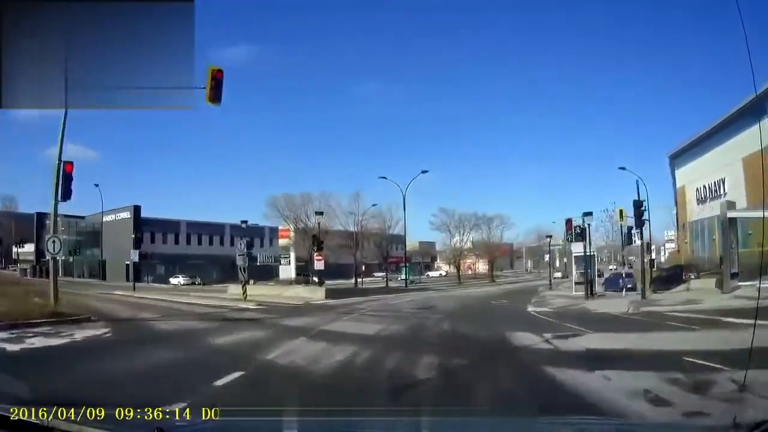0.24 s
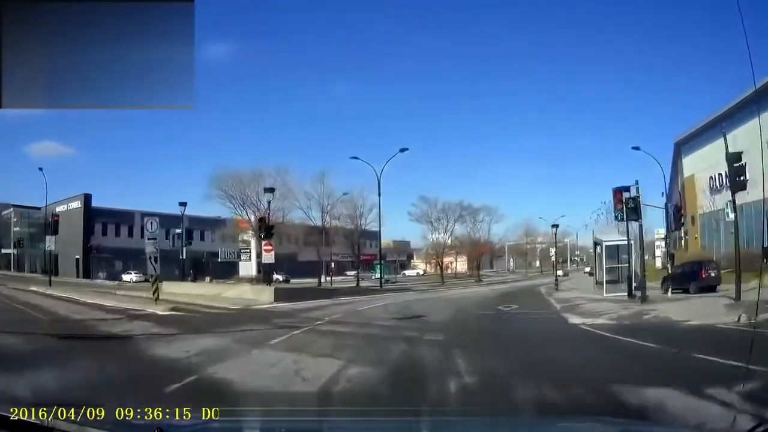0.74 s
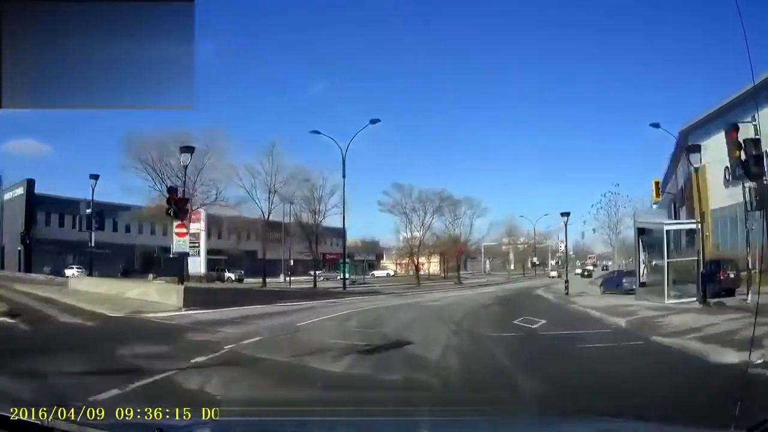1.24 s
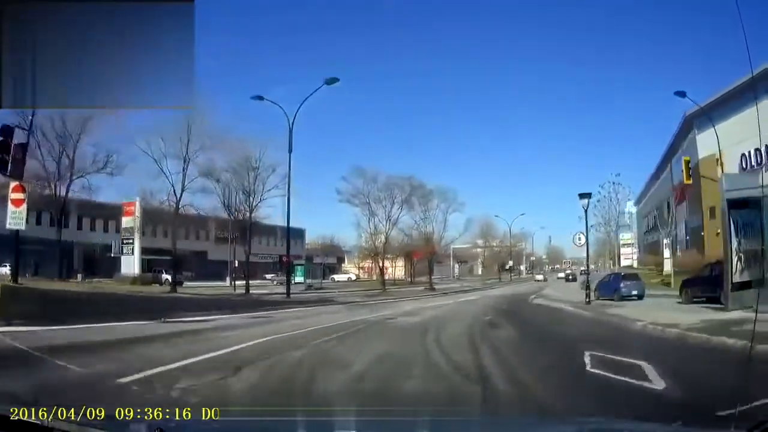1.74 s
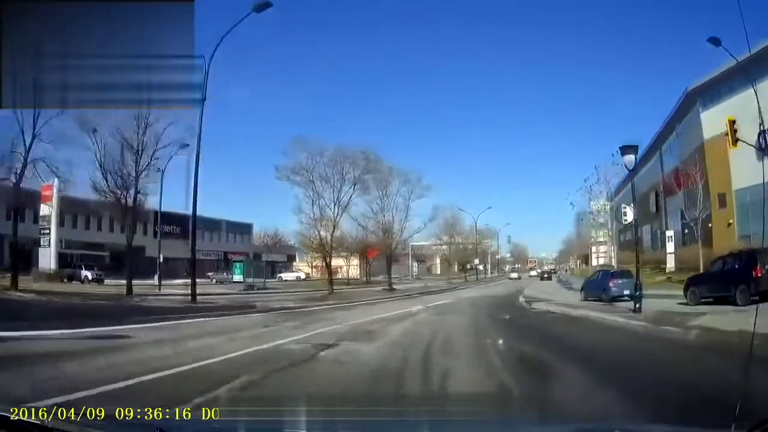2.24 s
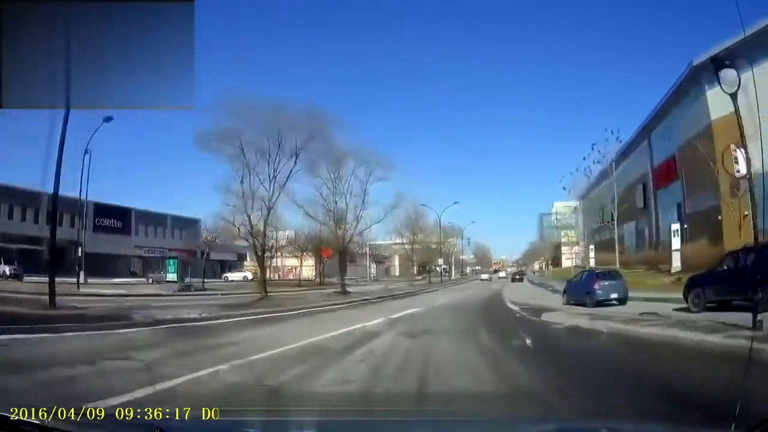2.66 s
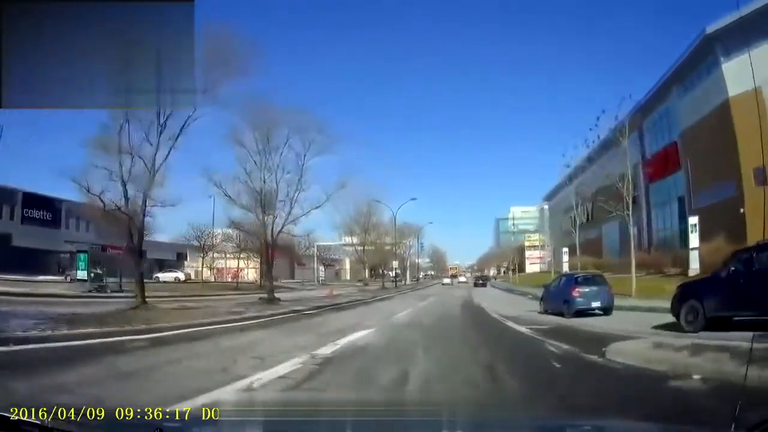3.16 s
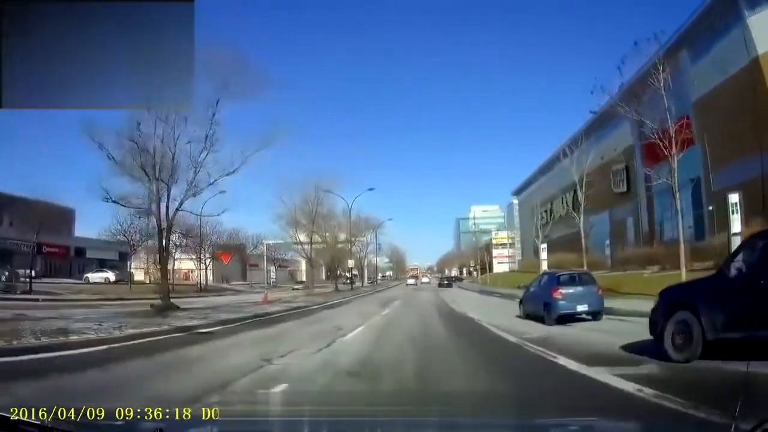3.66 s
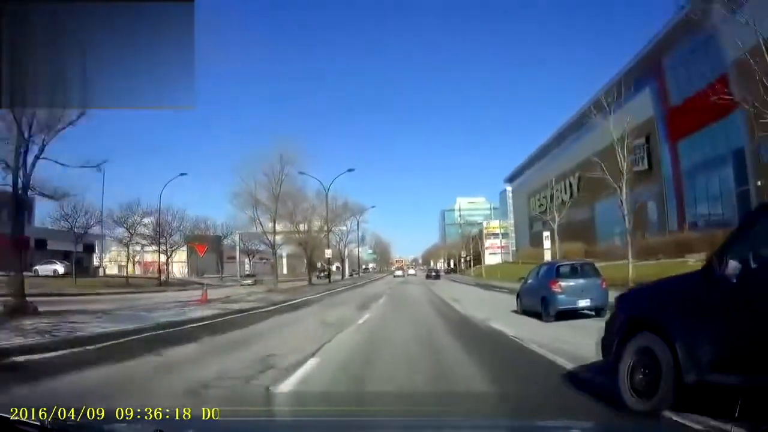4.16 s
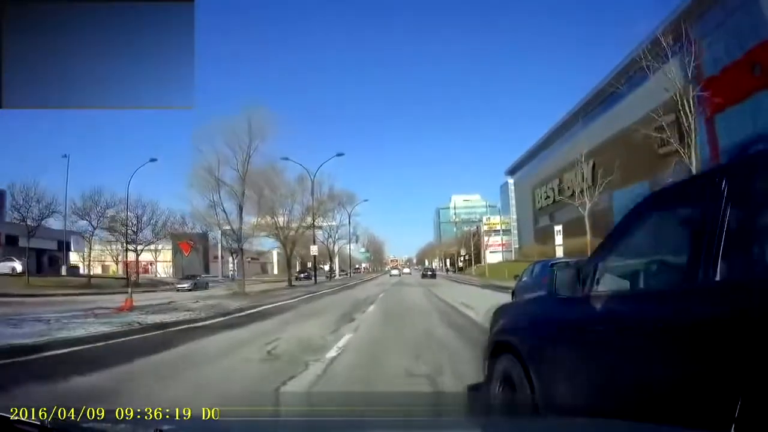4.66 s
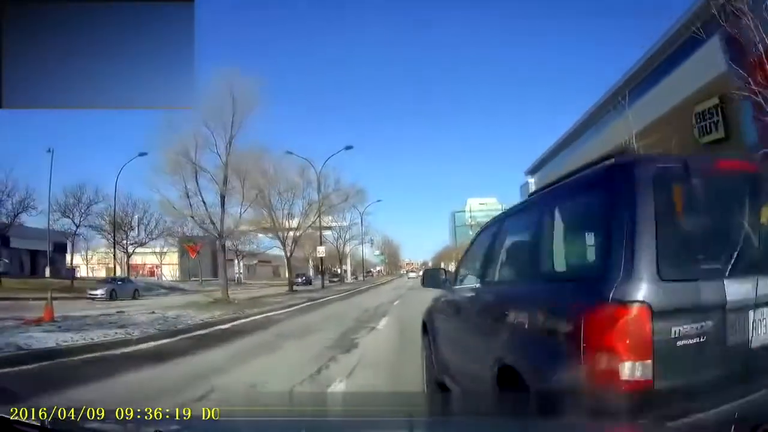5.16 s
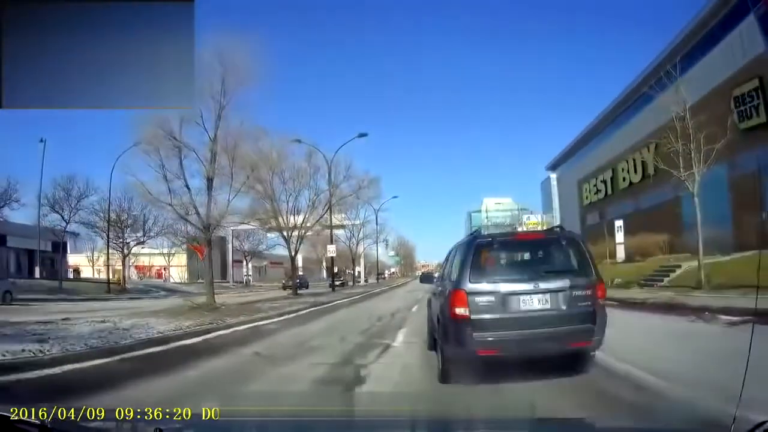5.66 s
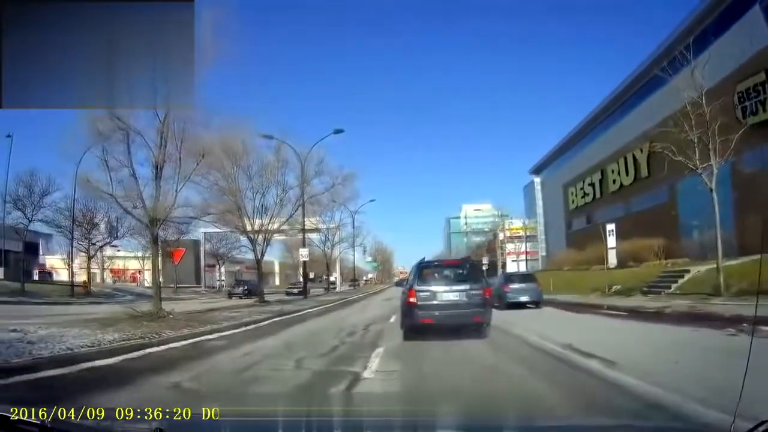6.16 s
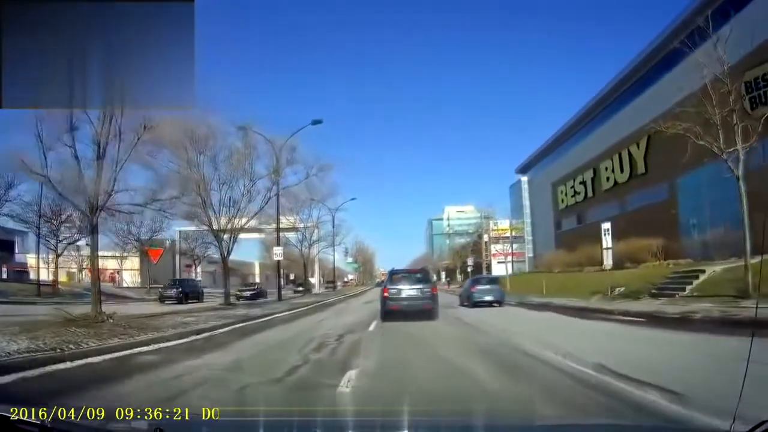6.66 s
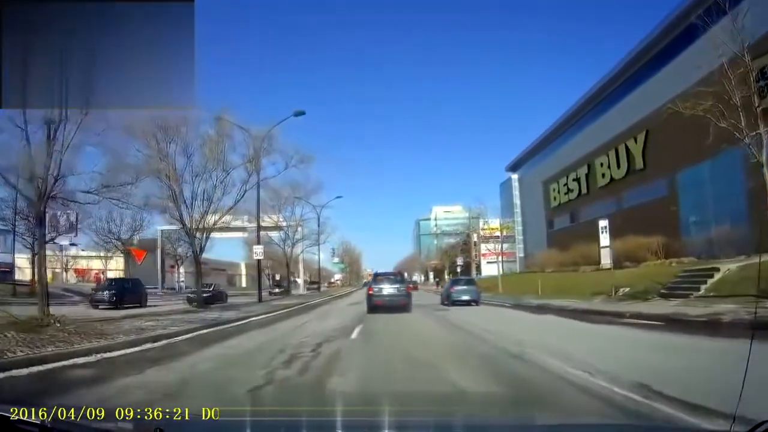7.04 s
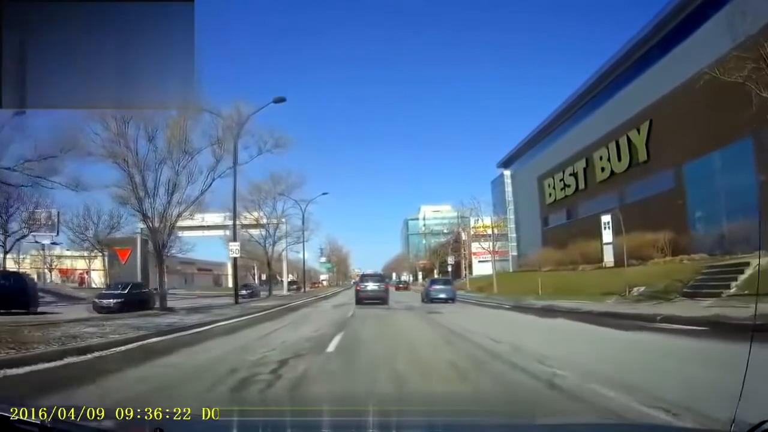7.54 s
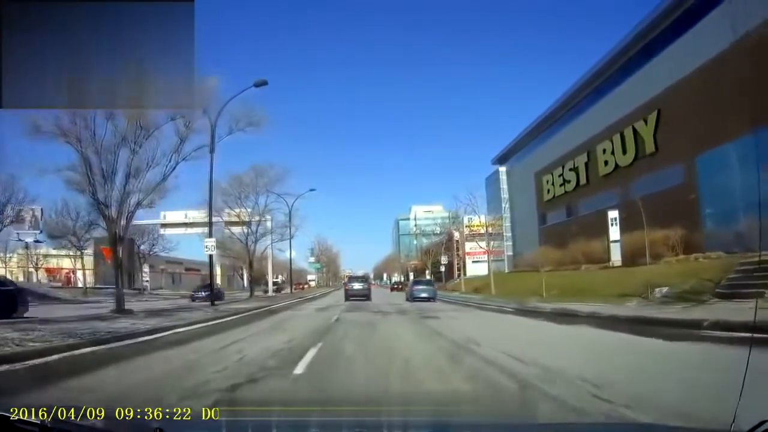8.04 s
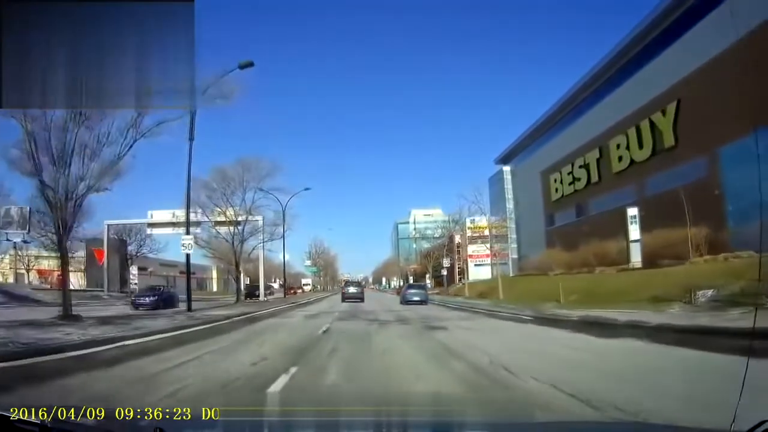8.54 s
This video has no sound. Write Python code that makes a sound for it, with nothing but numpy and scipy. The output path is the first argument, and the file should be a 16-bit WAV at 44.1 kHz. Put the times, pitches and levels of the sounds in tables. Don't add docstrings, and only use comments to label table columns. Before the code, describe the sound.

Heard from a dashboard microphone inside a car on a city road: low tyre roar, body boom and wind with small bumps. A sharp slap on the horn pad starts one long, buzzing blast. Hard braking scrubs the tyres, loose things slide, thud and jingle, and the sound briefly ducks. The horn stops, slow quiet rolling follows, then a few knocks and the engine revving gently.

```python
import sys
import numpy as np
from scipy import signal
from scipy.fft import rfft, irfft, next_fast_len
from scipy.io import wavfile
from scipy.ndimage import uniform_filter1d

SR = 44100
rng = np.random.default_rng(int(sys.argv[2]) if len(sys.argv) > 2 else 0)


def put_to_file(sound):
    columns = np.atleast_2d(sound).T
    safe = np.clip(columns, -1, 1)
    whole_steps = np.round(safe * 32767)
    wavfile.write(sys.argv[1], SR, whole_steps.astype(np.int16))


def makeup_ratio(level_db):
    decades = np.asarray(level_db, float) / 20
    return 10 ** decades


N = 388521
TIME = np.arange(N) / SR
SIZE = next_fast_len(N, True)
HZ = np.maximum(np.arange(SIZE // 2 + 1) * SR / SIZE, 1)

# (centre [Hz], width [Hz], level [dB])
PLASTIC_MODES = [(4500, 1500, 1.5), (7900, 1100, 1.5), (10500, 2500, -3.5), (14000, 2500, -10.5)]


def shaped(gain):
    x = irfft(rfft(rng.standard_normal(SIZE)) * gain, SIZE)[:N]
    return x / np.std(x)


def band(lo_hz, hi_hz):
    return 1 / np.sqrt((1 + (lo_hz / HZ) ** 8) * (1 + (HZ / hi_hz) ** 8))


def humps(modes):
    return sum(makeup_ratio(2 * db) / (1 + (2 * (HZ - f) / width) ** 2) for f, width, db in modes)


def walk(rate):
    hold = int(SR / rate)
    steps = np.repeat(rng.standard_normal(N // hold + 1), hold)
    return 1.35 * uniform_filter1d(uniform_filter1d(steps, hold), hold)[:N]


def bell(s, length):
    return np.exp(-((TIME - s) / length) ** 2)


def add(out, s, x):
    i = int(s * SR)
    out[i:i + len(x)] += x[:len(out) - i]


def fade(t60, rise):
    t = np.arange(int((t60 + 4 * rise) * SR)) / SR
    envelope = (1 - np.exp(-t / rise)) ** 2 * np.exp(-np.log(1000) * t / t60)
    return t, envelope / envelope.max()


def strike(out, s, hz, db, rise, t60):
    t, envelope = fade(t60, rise)
    add(out, s, makeup_ratio(db) * envelope * np.sin(2 * np.pi * hz * t))


def duck():
    start_s, fall_s, hold_s, back_s = 5.045, 0.09, 0.14, 0.054
    duck_db, after_db = -13.5, -1
    down = np.clip((TIME - start_s) / fall_s, 0, 1)
    back = np.exp(-np.maximum(TIME - start_s - fall_s - hold_s, 0) / back_s)
    return down * (after_db + (duck_db - after_db) * back)


def horn():
    # (multiple, with a car alongside [dB], once it has gone [dB], ring-down [s], wander [dB])
    low_partials = [(1, -23.5, -21.5, 0.071, -0.06), (2, -29.5, -32.5, .1, -0.8),
                    (3, -21.5, -22.5, 0.051, -0.95), (4, -44, -47, 0.14, -0.7), (5, -32.5, -30, 0.054, 1.1),
                    (6, -42, -56, .07, -1), (7, -40, -47.5, 0.056, .4)]
    # (multiple, with a car alongside [dB], once it has gone [dB])
    high_partials = [(8, -59, -62), (9, -68, -62), (10, -72, -69), (11, -76, -75), (12, -68, -71),
                     (13, -73, -74)]
    # (multiple, time [s], length [s], level [dB])
    echoes = [(1, 4.04, 0.18, 1.5), (1, 4.4, 0.092, 1), (1, 5.26, .04, 4), (2, 5.3, .14, -5),
              (5, 4.56, 0.45, -6.5), (5, 4.7, 0.074, 3), (5, 6.25, 0.16, 2.5), (5, 4.01, 0.13, 3),
              (6, 5.52, 0.2, 13), (7, 5.59, 0.16, 5.5), (8, 6.68, 0.1, 5), (3, 3.95, .15, -2),
              (2, 5.42, .1, -2.5), (5, 4.35, .08, -3), (5, 4.93, .07, -3), (5, 5.28, .04, 3),
              (8, 4.5, .3, 3), (2, 6.76, .08, 3), (9, 6.4, .5, 3), (7, 6.75, .1, -3), (3, 5.06, .03, -4)]
    on_s, off_s, horn_hz = 3.8, 6.8, 408.9
    attack_s, start_flat_hz, pull_up_s, sag_hz_per_s = 0.011, 15, 0.015, 100
    last_ring_s, last_ring_db = 0.035, 11
    tail_db, tail_t60_s = -14, 0.25
    bounce_rad = -2.2
    shake_rad = 0.05

    since, after = np.maximum(TIME - on_s, 0), np.maximum(TIME - off_s, 0)
    hz = horn_hz - start_flat_hz * np.exp(-since / pull_up_s) - sag_hz_per_s * np.minimum(after, 0.1)
    turn = 2 * np.pi * np.cumsum(hz + 0.37 * walk(40)) / SR
    gone = np.interp(TIME, [3.8, 5.0, 5.4, 6.8], [0, 0.15, 0.7, 1])
    last_db = last_ring_db * bell(off_s + last_ring_s, 0.7 * last_ring_s)
    cabin_tail_db = tail_db - 60 * after / tail_t60_s
    tone = 0
    for k, near_db, gone_db, ring, wander_db in low_partials + [row + (0.05, 1.2) for row in high_partials]:
        db = near_db + (gone_db - near_db) * gone + (k == 2) * last_db
        db = db + np.maximum(-60 * (after / ring) ** 2.6, cabin_tail_db)
        echo = sum(echo_db * bell(s, length) for which, s, length, echo_db in echoes if which == k)
        db = db + (1 + 0.35 * walk(35)) * echo
        wander, flutter = walk(13), walk(30)
        db = db + min(wander_db, 1.3) * wander + 0.84 * flutter
        stroke = np.pi / 2 * (k % 2 == 0)
        bounce = ((k > 2) * bounce_rad + k * shake_rad * flutter) * (1 - gone)
        tone = tone + np.sqrt(2) * makeup_ratio(db) * np.cos(k * turn + stroke + bounce)
    metal = makeup_ratio(-50.5) * shaped(band(900, 2300)) + makeup_ratio(-64.5) * shaped(band(2200, 2800))
    fizz = (1 + 0.7 * np.cos(turn)) * metal * makeup_ratio(-60 * (after / 0.08) ** 2)
    return (1 - np.exp(-since / attack_s)) * makeup_ratio(duck()) * (tone + fizz)


def knocks():
    # (time [s], crack [dB], panel [dB], sizzle [dB], ring-down [s])
    slaps = [(0.636, -45, -39, -66, 0.061), (2.2098, -53, -37, -56, 0.019), (3.658, -46, -32.5, -62, 0.03),
             (3.7689, -25, -30, -47, 0.075), (3.7775, -10, -21, -33, 0.035), (3.7815, -19, -28, -35, .03),
             (3.785, -16, -25, -34, 0.02), (3.7935, -18, -27, -39, .012), (3.801, -32, -40, -50, .08),
             (3.812, -31, -44, -54, .06), (3.789, -21, -38, -36, 0.14),
             (3.8363, -28.5, -25.5, -55.5, 0.064), (3.8504, -24.5, -32, -50, 0.06),
             (4.0135, -28, -26, -57.5, 0.04), (4.1844, -44, -22.5, -50, 0.039),
             (6.858, -45, -35.5, -65, 0.083), (7.251, -50, -37, -70, 0.025), (8.046, -30, -33.5, -47, 0.05),
             (8.068, -34, -36, -62, 0.04), (8.092, -37, -42, -55.5, 0.04), (8.5822, -26.5, -30, -54, 0.03),
             (8.588, -34, -36, -60, .07)]
    # (time [s], crack [dB], panel [dB], sizzle [dB], ring-down [s])
    dash_hits = [(5.034, -33, -30, -55, 0.052), (5.041, -33, -18, -55, .05), (5.0705, -22, -20, -32, .03),
                 (5.0835, -24, -25, -33, .02), (5.0534, -28, -25, -33, 0.04),
                 (5.0625, -21, -9.5, -33, 0.055), (5.0745, -9, -13, -15, 0.016),
                 (5.0804, -33.5, -28.5, -50, 0.029), (5.0963, -31, -25, -49.5, 0.054),
                 (5.1217, -38, -40, -61.5, 0.053), (5.1392, -47, -24, -47, 0.052),
                 (5.1542, -43, -47, -55, 0.037), (5.197, -23, -24, -57, 0.017),
                 (5.2205, -27, -24, -43.5, 0.018), (5.402, -26, -29, -44, 0.04),
                 (5.408, -36, -40, -47, .12), (5.523, -33, -34, -39, 0.023), (5.5325, -42, -34, -46, 0.07),
                 (5.5852, -38, -42, -46, 0.027), (5.598, -39, -24, -39, 0.013)]
    # (time [s], peak [dB])
    plastic_ticks = [(5.0514, -27), (5.0914, -36), (5.108, -42), (5.1297, -39), (5.1364, -39),
                     (5.1424, -34), (5.1477, -36), (5.154, -34), (5.1604, -37), (5.1684, -41),
                     (5.1734, -43), (5.1794, -47), (5.186, -42), (5.1961, -40), (5.2165, -36), (5.283, -43),
                     (5.2074, -41), (5.2234, -46), (5.23, -48), (5.2428, -42), (5.252, -38),
                     (5.2644, -37.5), (5.2686, -34), (5.275, -43), (5.2804, -44), (5.3108, -53),
                     (5.3373, -53), (5.6015, -41), (5.6095, -42.5), (5.6225, -46), (3.8385, -40),
                     (6.8349, -48)]
    # (centre [Hz], width [Hz], level [dB])
    shell_modes = [(2320, 570, 9.5), (5230, 2000, 2)]
    # (centre [Hz], width [Hz], level [dB])
    trim_modes = [(268, 77, 2.5), (570, 350, 7), (1050, 100, 6), (1750, 58, -9.5), (2340, 730, -3)]

    crack, panel, sizzle, tick = np.zeros((4, N))
    for s, crack_db, panel_db, sizzle_db, t60 in slaps + dash_hits:
        s, t60 = s - 0.0015, max(t60, 0.005)
        add(crack, s, makeup_ratio(crack_db - 10.5) * fade(t60, 0.0015)[1])
        add(panel, s, makeup_ratio(panel_db) * fade(1.92 * t60, 0.0007)[1])
        add(sizzle, s, makeup_ratio(sizzle_db - 1.0) * fade(0.38 * t60, 0.00066)[1])
    for s, db in plastic_ticks:
        add(tick, s, makeup_ratio(db - 6) * fade(0.0037, 0.00035)[1])
    cracks = crack * shaped(band(1600, 7000) ** 2 * np.sqrt(1 + humps(shell_modes)))
    panels = panel * shaped(np.sqrt(humps(trim_modes)) * band(150, 3200))
    sizzles = sizzle * shaped(band(6500, 19000) * (8000 / HZ) ** 1.3)
    ticks = tick * shaped(np.sqrt(humps(PLASTIC_MODES)) * band(6000, 15500))
    return cracks + panels + sizzles + ticks


def thuds():
    # (time [s], pitch [Hz], peak [dB], rise [s], ring-down
    # [s])
    struck_modes = [(0.618, 101, -33, 0.017, 0.21), (2.19, 50, -22, .01, 0.085), (3.71, 129, -24, 0.005, .1),
                    (4.14, 130, -37.5, .02, 0.19), (4.13, 31.8, -23.5, 0.021, 0.28),
                    (4.15, 501, -26, 0.01, 0.2), (4.165, 545, -29, .006, .12), (4.19, 480, -27, .006, .15),
                    (4.14, 60, -20, .008, .1),
                    (5.037, 263, -14.5, 0.003, 0.09), (5.082, 240, -14, .004, .06),
                (5.168, 105, -21, .008, .12), (5.21, 100, -23, .01, .15), (5.148, 400, -16, .003, .05),
                (5.061, 482, -8, 0.0065, 0.078), (5.08, 126.3, -15, 0.011, 0.12),
                (5.14, 236.3, -13.5, 0.0092, 0.15), (5.138, 116, -14, 0.0068, 0.12),
                (5.179, 40.5, -15, 0.0085, .2), (5.04, 206.5, -19, 0.026, 0.38),
                (5.16, 317, -18.5, .015, 0.13), (5.192, 229, -15, 0.005, 0.067),
                (5.25, 230, -23, 0.011, 0.13), (5.52, 121.4, -21, 0.025, 0.37),
                (5.57, 270, -20, .015, 0.093), (5.72, 522, -23, 0.0058, 0.12), (5.735, 480, -28, .004, .08),
                (5.105, 330, -16, .004, .06), (5.17, 420, -19, .004, .08), (5.108, 150, -18, .005, .07),
                (5.74, 40.5, -25, 0.017, 0.2),
                    (2.212, 1060, -21, .0006, .022), (2.212, 1700, -26, .0006, .02),
                 (2.212, 3000, -33, .0004, .012), (3.772, 709, -18.5, 0.0044, 0.088),
                 (8.055, 800, -36, .002, .03), (8.048, 2600, -40, .001, .02), (8.066, 150, -25, .002, .04),
                 (8.584, 1950, -36, .001, .03), (8.523, 5000, -55, .001, .015),
                 (8.529, 5200, -54, .001, .03), (8.548, 5200, -50, .001, .015),
                 (8.549, 2100, -44, .001, .02), (6.818, 2400, -40, .002, .04),
                 (6.833, 2100, -46, .002, .05), (2.211, 620, -27, .001, .03), (2.2, 300, -28, .003, .05),
                 (5.09, 45, -22, .01, .2), (6.833, 5500, -49, .002, .015), (6.836, 5100, -51, .002, .015),
                 (6.375, 4800, -58, .003, .04), (3.838, 5300, -34, .0006, .025),
                 (3.777, 6500, -24, .0008, .03), (3.778, 4400, -24, .0008, .04),
                 (7.248, 512, -33, .001, .025), (7.252, 1600, -45, 0.0009, 0.03),
                 (7.253, 1100, -38, 0.0009, 0.03), (7.251, 2500, -48, .001, .02),
                 (7.54, 400, -40, .004, .05), (.261, 710, -32, .001, 0.027),
                 (7.525, 246, -33, 0.0043, 0.068), (8.052, 82, -19.5, 0.003, .2),
                 (8.05, 44, -27, 0.011, .25)]

    out = np.zeros(N)
    for s, hz, db, rise, t60 in struck_modes:
        strike(out, s, hz, db, rise, t60)
    return out


def keys():
    # (pitch [Hz], level [dB], ring-down [s])
    bunches = [
        [(9450, -14, .08), (10000, 0, .045), (13300, -9, .08), (14000, -10, .035), (15150, -8, .1)],
        [(9450, -1, .1), (13300, 2, .04), (14000, -8, .05), (15400, -16, .1), (6800, -10, .05)],
        [(13200, 0, .03), (9900, -8, .02), (6200, -6, .02), (10900, -10, .03), (15150, -9, .1)],
    ]
    jingle_s = (5.402, 5.408, 5.436, 5.459, 5.467, 5.531, 5.537)
    jingle_bunch = (0, 0, 2, 2, 2, 1, 1)
    jingle_db = (-34, -38, -50, -54, -53, -42, -48)

    out = np.zeros(N)
    for s, db, bunch in zip(jingle_s, jingle_db, jingle_bunch):
        for hz, key_db, t60 in bunches[bunch]:
            swing = makeup_ratio(1.2 * walk(150))
            t, envelope = fade(t60, 0.0005)
            ring = np.sin(2 * np.pi * hz * t)
            add(out, s, makeup_ratio(db + key_db) * envelope * swing[:len(t)] * ring)
    return out


def slide():
    # (time [s], length [s], rumble [dB], scrape [dB], grit [dB])
    slides = [
        (5.051, 0.034, -14.5, -21.5, -37),
        (5.132, 0.024, -24, -24.5, -47.5),
        (5.154, 0.082, -23, -42, -48),
        (5.258, .04, -33.5, -44, -60.5),
        (5.52, 0.058, -36, -50, -54),
        (5.585, 0.042, -41, -50, -50),
        (8.058, 0.055, -34, -44, -52),
    ]
    rise_s, t60_s = 0.017, 0.12
    rumble, scrape, grit = np.zeros((3, N))
    for s, length, rumble_db, scrape_db, grit_db in slides:
        rise = np.clip((TIME - s) / rise_s + 1, 0, 1) ** 2
        envelope = rise * makeup_ratio(-60 * np.maximum(TIME - s - length, 0) / t60_s)
        rumble += makeup_ratio(rumble_db) * envelope
        scrape += makeup_ratio(scrape_db) * envelope
        grit += makeup_ratio(grit_db) * envelope
    low = rumble * shaped(band(80, 650))
    middle = makeup_ratio(-5.0) * scrape * shaped(band(980, 2900))
    high = makeup_ratio(-9.5) * grit * shaped(np.sqrt(humps(PLASTIC_MODES)) * band(3000, 15500))
    jolts = makeup_ratio(3.2 * walk(90))
    return jolts * (low + middle + high)


def engine():
    # (time [s], firing rate [Hz], level [dB])
    pick_up = [
        (8.13, 134.3, -41),
        (8.2, 139.3, -41.5),
        (8.35, 143.2, -39.5),
        (8.5, 145.7, -40),
        (8.62, 152, -43),
        (8.81, 149.3, -39.5),
    ]
    s, hz, db = np.transpose(pick_up)
    turn = 2 * np.pi * np.cumsum(np.interp(TIME, s, hz) + 0.8 * walk(25)) / SR
    # (multiple of the firing rate, dB)
    orders = [(.5, -6.5), (1, 0.5), (1.5, -7.0), (2, -4.5), (2.5, -9.5), (3, -16.5), (3.5, -8), (4, -14)]
    tone = sum(makeup_ratio(order_db + 1.3 * walk(12)) * np.sin(k * turn) for k, order_db in orders)
    level = uniform_filter1d(makeup_ratio(np.interp(TIME, s, db, left=-120)), size=2000)
    return np.sqrt(2) * level * tone


def road():
    # (frequency [Hz], density [dB per Hz])
    cabin = [(14, -26.5), (24, 0), (45, 0.5), (75, -6), (130, -1.5), (190, -12), (370, -9), (440, -12),
             (1100, -21.5), (1500, -31.5), (2250, -29), (2950, -39), (3500, -51), (15700, -61.5)]
    # (centre [Hz], width [Hz], level [dB])
    booms = [(101, 20, 0), (152, 32, -4), (246.3, 15, 4.5), (355, 17, 0.5), (1080, 81, 3.5),
             (5270, 940, 1.5)]
    # (time [s], level against cruising [dB])
    speed_curve = [(0, 0), (.5, 0.5), (2.4, 2), (3.5, 0), (5.0, 0), (5.7, -3.5), (6.1, -7), (6.75, -7),
                   (7.0, -9), (7.2, -7.5), (7.7, -11.5), (8.05, -9.5), (8.25, -5), (8.81, -6)]
    # (time [s], effort [0-1])
    brake_curve = [(3.65, 0), (3.85, 0.2), (4.07, 1), (4.4, 1), (5.0, .9), (5.6, 1), (6.1, 0.98),
                   (6.75, 0.95), (6.86, 0.08)]
    # (time [s], length [s], centre
    # [Hz], level [dB])
    bump_swells = [(.01, 0.11, 60, 2), (0.595, .2, 152, 6), (0.733, 0.14, 39.8, 6), (1.543, 0.073, 120, 2),
                   (2.04, 0.084, 50, 5), (3.74, 0.18, 6470, 11.5), (3.9, 0.37, 130, 2),
                   (4.2, 0.32, 39.4, 2), (4.552, 0.26, 60, -3.5), (5.172, .1, 200, 16.5),
                   (5.55, 0.26, 173, 5), (6.66, 0.13, 6070, 0), (7.207, 0.28, 2000, 3),
                   (7.7, .35, 350, -2.5), (4.12, .15, 2900, -2.5), (7.45, .15, 90, 3),
                   (7.72, 0.073, 40, 12), (8.52, 0.081, 2700, 6), (8.55, 0.21, 650, 6.5),
                   (7.4, 0.31, 6000, 2.5), (6.92, 0.13, 6000, 4.5), (1.6, .08, 5500, 3.5),
                   (3.95, 0.096, 13000, 10), (3.762, 0.062, 13000, 15), (8.335, 0.23, 5740, 5.5)]
    control_hz = (45, 180, 600, 1500, 2600, 4000)
    speed_share = (0.59, 1, 0.86, 1, .7, 0.12)
    brake_db = (3.8, 1.3, 8.4, 15.7, 20.8, 11.1)
    duck_share = (0.11, .4, .6, 0.97, 0.73, .6)
    swell_octaves = 1.43

    speed = np.interp(TIME, *np.transpose(speed_curve))
    brake = np.interp(TIME, *np.transpose(brake_curve))
    swells = np.array([db * bell(s, length) for s, length, _, db in bump_swells])
    swell_hz = np.array(bump_swells)[:, 2]
    cabin_hz, cabin_db = np.transpose(cabin)
    colour = makeup_ratio(np.interp(np.log(HZ), np.log(cabin_hz), cabin_db)) * np.sqrt(1 + humps(booms))
    out, bumps, down = 0, walk(6), duck()
    for step in range(20):
        hz = 22 * 2 ** (step / 2)
        gain = colour * np.cos(np.pi * np.clip(np.log2(HZ / hz), -0.5, 0.5))
        controls = (speed_share, brake_db, duck_share)
        share, scrub_db, dip = (np.interp(np.log(hz), np.log(control_hz), row) for row in controls)
        reach = np.exp(-(np.log2(swell_hz / hz) / swell_octaves) ** 2)
        hiss = min(max(np.log2(hz / 5000), 0), 1)
        moving_db = share * speed + scrub_db * brake + reach @ swells + 0.72 * bumps
        db = (1 - 0.41 * hiss) * moving_db + 1.1 * walk(12) + dip * down
        out = out + makeup_ratio(db) * np.sqrt(np.mean(gain ** 2)) * shaped(gain)
    return makeup_ratio(-10.5) * out


def electronics():
    whine_hz, whine_db = 9530, -74
    writing = uniform_filter1d(1.0 * (np.abs(TIME % 1 - 0.345) < 0.115), size=2000)
    whine = np.sqrt(2) * makeup_ratio(whine_db + duck()) * np.sin(2 * np.pi * whine_hz * TIME)
    return whine + makeup_ratio(-74.0) * writing * shaped(band(14000, 14500) ** 8)


def scene():
    in_car = horn() + knocks() + thuds() + keys() + slide()
    return (in_car + engine() + road() + electronics())[None]


def band_limit(x):
    return signal.sosfilt(signal.butter(12, 15760, fs=SR, output="sos"), x)


def record(dry):
    rounded = 0.9 * dry / (1 + (dry / 0.58) ** 4) ** (1 / 4)
    top_cut = signal.ellip(8, 0.2, 70, 15450, fs=SR, output="sos")
    return band_limit(signal.sosfilt(top_cut, rounded))


dry = scene()
out = record(dry)
put_to_file(out)
```